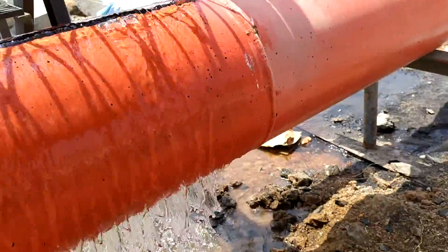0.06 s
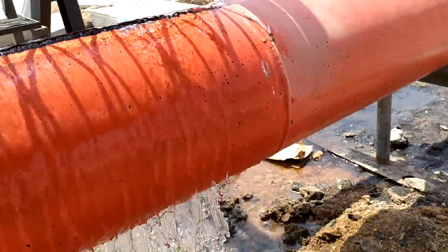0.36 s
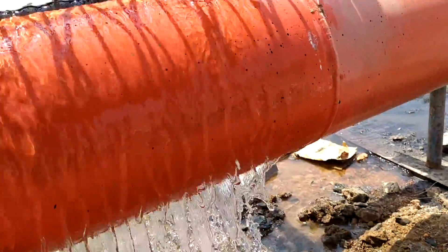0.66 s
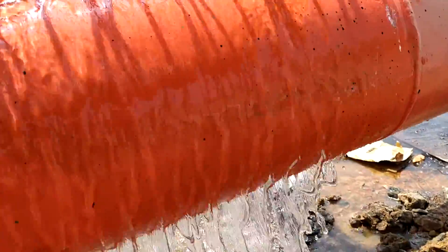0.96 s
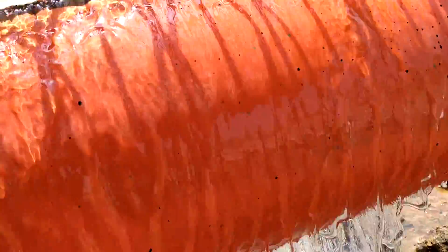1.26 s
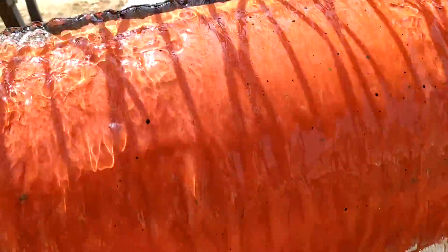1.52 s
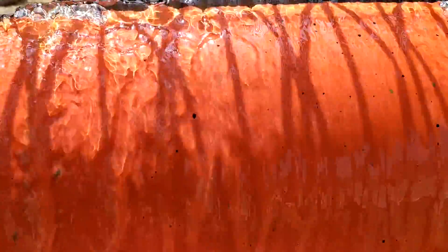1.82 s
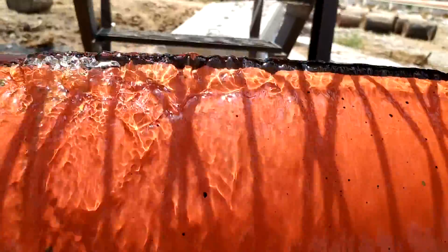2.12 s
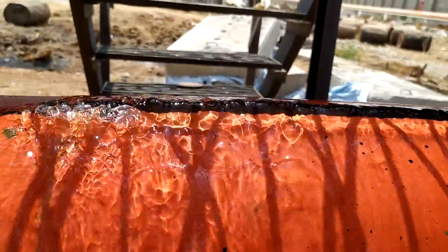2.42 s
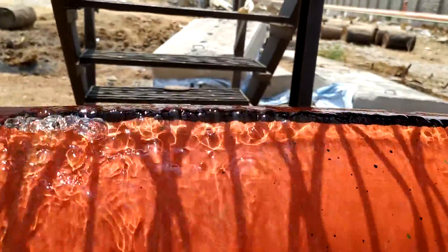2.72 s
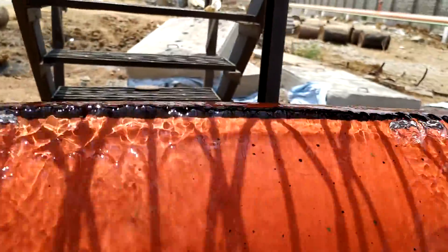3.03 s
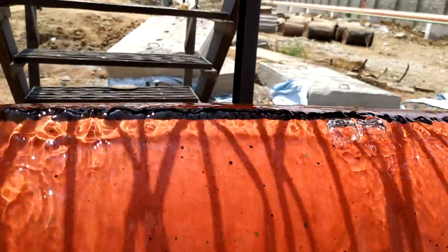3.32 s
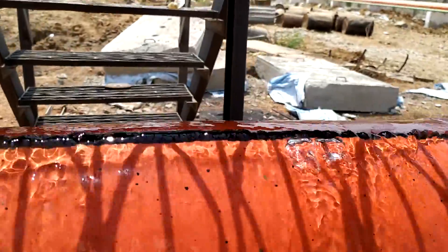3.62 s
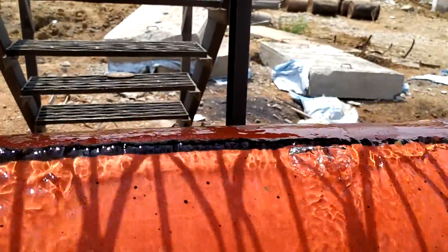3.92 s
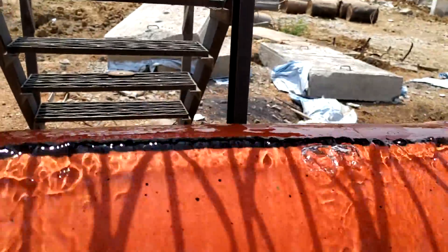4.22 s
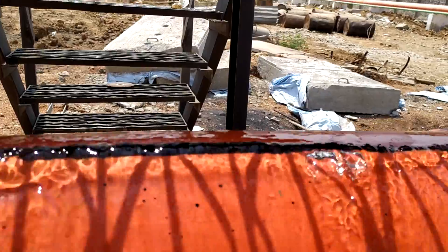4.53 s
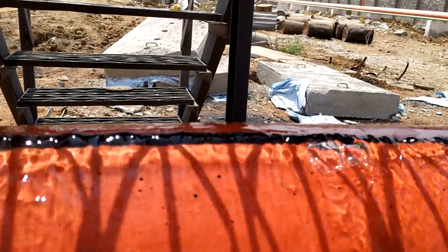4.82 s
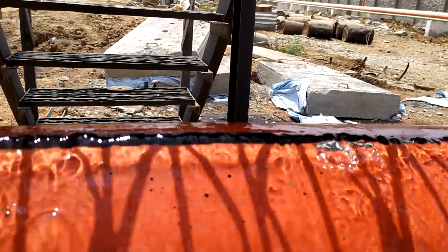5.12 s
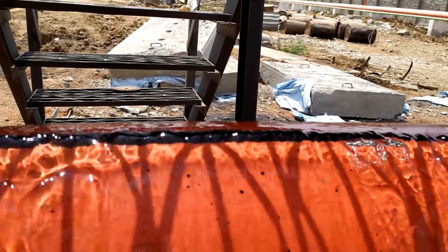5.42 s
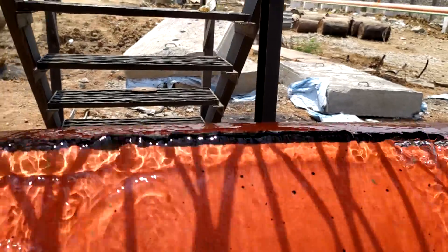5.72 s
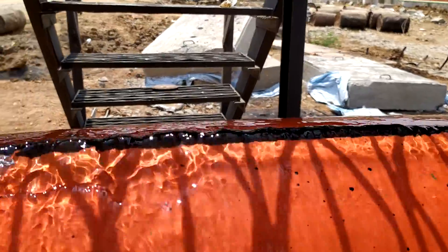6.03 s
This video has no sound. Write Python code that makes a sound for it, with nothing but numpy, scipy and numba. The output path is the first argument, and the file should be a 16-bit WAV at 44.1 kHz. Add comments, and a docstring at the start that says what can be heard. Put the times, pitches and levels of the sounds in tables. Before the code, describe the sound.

From the first moment, water gushes from a split in a big steel pipe and falls on wet ground outdoors, making a dense, bright, hissing splash with quick irregular surges. It lasts the whole six seconds. Beneath it, air churns in the split with a hollow gurgle and scattered short gulps. Close drops slap sharply on wet steel or plink, several times a second. Around 1 second, a puddle bubbles softly. Between about 0.5 and 2 seconds the microphone moves from beside the pipe up to the split, and the splash grows slightly louder, sitting a little to the left. The gurgling is fullest near 2 seconds. A distant diesel engine drones low and quiet throughout, working a touch harder around 2 seconds before easing. From about 5.5 seconds the water slackens very slightly but keeps running.

```python
"""A dense, surging splash is heard first: water wells from a split in a big steel pipe and falls on wet ground.
Each impact is a short damped tick and each trapped bubble a resonator; thousands of them add up to a hiss.
Air churns and gulps in the split, near drops slap and plink, and a diesel engine drones some way off.
A microphone with two ports rises from beside the pipe to the split, and the splash grows louder."""
import sys
import numpy as np
from scipy import signal
from scipy.fft import rfft, irfft
from scipy.io import wavfile
from scipy.ndimage import map_coordinates
from numba import njit

SR = 44100
rng = np.random.default_rng(int(sys.argv[2]) if len(sys.argv) > 2 else 0)


def master_out(mix):
    """Clip the mix to full scale and print it as 16-bit PCM to the path in sys.argv[1]."""
    frames = np.transpose(np.atleast_2d(mix))
    ceiling = np.clip(frames, -1, 1)
    pcm = np.round(ceiling * 32767).astype(np.int16)
    wavfile.write(sys.argv[1], SR, pcm)


N = 267246
TIME = np.arange(N) / SR

# engine harmonics: multiple of the cycle rate, rms level/dB, gain at full effort/dB, pipe shielding/(dB/s)
ENGINE_HARMONICS = [(3, -59.5, 0, -.15), (4, -50.9, 1, -1.3), (5, -50.3, 0, -.15), (7, -57, 5.5, -1),
                    (8, -64, 9, -.3), (10, -69, 4, 0), (12, -72, 4, 0), (14, -71, 3, 0)]
# spectrum of the engine rumble: f/Hz, relative level/dB
RUMBLE_SPECTRUM = [(12, -45), (29, -22), (45, -6), (62, 0), (85, -2), (125, -8.5), (200, -12), (320, -19),
                   (700, -35)]
# modes of the air space behind the split: f/Hz, width/Hz, gain/dB
CAVITY_MODES = [(521, 79, 3), (895, 132, 3.5), (1377, 190, -2.5)]
# air pockets leaving the split: t/s, level/dB, starting f/Hz, ring time/s, fractional rise in pitch
AIR_GULPS = [(.096, -29.5, 484, 0.092, 0), (.331, -28, 565, 0.089, 0), (.486, -31, 477, .08, 0.17),
             (0.913, -28.5, 480, 0.074, 0.075), (1.004, -28.5, 502, .14, 0.14),
             (1.009, -31, 259, 0.054, 1.3), (1.049, -31.5, 444, 0.17, .1), (1.347, -29.5, 468, 0.065, 0),
             (1.816, -30, 462, 0.063, 0.59), (1.995, -30, 406, 0.12, 0.46),
             (2.122, -27.5, 166, 0.037, 0.83), (2.63, -34.5, 297, 0.13, 1.4), (2.657, -33, 448, 0.091, 0.2),
             (2.691, -26, 385, 0.037, 0.69), (2.798, -37, 285, 0.088, 0.26), (2.896, -26, 507, 0.029, 0.05),
             (3.152, -25.5, 474, 0.034, 0.16), (3.608, -26.5, 433, .045, 0.91),
             (3.739, -31, 345, 0.036, 0.73), (3.74, -32, 540, 0.056, 0.36), (4.211, -28, 500, 0.065, 0.13),
             (4.263, -29.5, 91, 0.13, 0.052), (4.532, -28, 474, 0.077, 0.054),
             (4.808, -34, 442, 0.16, 0.24)]
# near drops striking wet steel: t/s, level/dB, f/Hz
DROP_SLAPS = [(.6314, -14.5, 5050), (1.0678, -12.5, 4050), (1.1777, -18, 2700), (1.2918, -13, 4830),
              (1.3969, -15, 3680), (1.509, -16, 4340), (1.672, -12.5, 8360), (1.8324, -12.5, 4100),
              (1.9328, -12, 5170), (1.9806, -16, 8150), (2.2964, -11.5, 6340), (2.5993, -14, 7500),
              (2.6294, -11, 5400), (2.7657, -16, 5940), (2.8422, -15.5, 5700), (3.1552, -13, 5400),
              (3.227, -17, 6450), (3.303, -14, 6150), (3.315, -16, 6100), (3.515, -14, 6800),
              (3.549, -13, 5400), (3.843, -11, 5900), (3.9946, -11, 5600), (4.0447, -12.5, 6250),
              (4.3717, -22, 6800), (4.4428, -13.5, 2600), (4.541, -13, 7460), (4.728, -13, 3800),
              (4.898, -12, 5460), (5.046, -17, 6400), (5.4944, -19, 6150), (5.7918, -12, 5600),
              (5.9354, -13, 3500), (5.9627, -20, 6430)]
# near drops trapping a bubble: t/s, level/dB, f/Hz, ring time/s
DROP_PLINKS = [(0.0747, -31, 1140, 0.038), (.397, -18, 2530, 0.028), (.815, -22.5, 900, 0.032),
               (.889, -21, 860, 0.018), (.923, -23, 2820, 0.028), (1.024, -18, 2400, 0.016),
               (1.396, -22, 3650, .03), (1.412, -28, 917, 0.059), (1.519, -20, 3100, .02),
               (1.59, -23, 830, .025), (1.631, -26, 2570, .03), (2.765, -18.5, 1260, 0.02),
               (3.123, -23, 1370, 0.024), (3.63, -25, 874, 0.053), (4.317, -24, 1220, 0.022),
               (4.643, -22, 1470, .02), (4.858, -27, 887, 0.066), (5.041, -20, 1950, 0.029),
               (5.05, -23, 1320, 0.058), (5.324, -23.5, 780, 0.029)]
# balance of the near drops, which land mostly on the left: f/Hz, left minus right level/dB
DROP_BALANCE = [(1200, 1), (2600, 10), (5000, -4), (12000, 19)]
# spectrum of the splash: f/Hz, relative level/dB
SPLASH_SPECTRUM = [(150, -18.5), (340, -26), (500, -16), (690, -15.5), (930, -10.5), (1100, -10),
                   (1380, -6), (1580, -11.5), (2150, -2), (2900, -0.43), (3800, -2.5), (5300, -0.94),
                   (8300, 0.7), (10000, -3), (11800, -6.5), (15800, -8.5)]
# added colour of the splash beside the pipe: f/Hz, gain/dB
BESIDE_PIPE = [(280, 3.5), (430, 10), (750, 0), (1080, 0), (1350, -4.8), (2000, 0), (2600, 0.5), (3300, -1),
               (4500, 2.5), (7000, -2.5), (9500, 0)]
# the pipe wall reflects the hiss to the left: f/Hz, left minus right level/dB
WALL_BALANCE = [(500, -2.5), (1550, -3.5), (1900, 0.5), (3300, 1), (4300, 3.5), (5300, 7), (7000, 4.5),
                (8300, 0.5), (13000, 0)]
# brief swells and dips in the splash at set times: t/s, change in level/dB
SPLASH_SURGES = [(.235, 2.3), (.335, 0.5), (1.03, 1), (1.074, 3.2), (1.393, 2), (1.513, 1.5), (1.635, 1),
                 (1.672, 0.5), (1.724, 1.5), (1.932, -2.5), (1.988, 1), (2.139, 1), (2.294, 2),
                 (2.601, -1.5), (2.768, 0.5), (3.021, 0.5), (3.156, 2), (3.226, 1.3), (3.505, 2),
                 (3.551, 1), (3.841, 0), (3.991, 0), (4.206, 1.8), (4.319, 2.2), (4.54, 2), (4.894, 1.8),
                 (5.197, 1), (5.936, 1.5)]

SIDES = np.array([[.5], [-.5]])  # shares of a left minus right difference


def undb(db):
    """Amplitude ratio of a level in decibels."""
    return 10 ** (np.asarray(db) / 20)


def level(x, db):
    """Scale to an rms level."""
    return x * undb(db) / np.sqrt(np.mean(x ** 2))


def colour(x, points, share=1):
    """Linear filtering by a curve of (f/Hz, gain/dB), or by a share of it."""
    hz, db = np.transpose(points)
    bins = np.maximum(np.fft.rfftfreq(N, 1 / SR), 1)
    return irfft(rfft(x) * undb(share * np.interp(np.log(bins), np.log(hz), db)), N)


def resonate(x, modes):
    """Modal superposition: parallel resonances with steep skirts."""
    bins = np.maximum(np.fft.rfftfreq(N, 1 / SR), 1)
    response = sum(undb(db) / (1 + .5j * hz / width * (bins / hz - hz / bins)) ** 2
                   for hz, width, db in modes)
    return irfft(rfft(x) * response, N)


def wander(per_s):
    """Smooth random fluctuation of unit rms, with `per_s` new values a second."""
    values = rng.standard_normal(N // 100)
    return level(map_coordinates(values, [TIME * per_s], order=3, mode="mirror"), 0)


def swell(at_s, width_s):
    """Gaussian envelope of unit height."""
    return np.exp(-.5 * np.minimum(((TIME - at_s) / width_s) ** 2, 100))


def pulse(at_s, attack_s, release_s):
    """Gaussian envelope with unequal flanks."""
    return swell(at_s, np.where(TIME < at_s, attack_s, release_s))


@njit
def ring(start, hz, t60, size, lag, rise, onset_cycles):
    """Damped oscillators gliding up in pitch; each reaches the left port `lag` s after the right."""
    out = np.zeros((2, N))
    for k in range(len(start)):
        count = int(t60[k] * SR * .8) + 2
        pole = (2j * np.pi * hz[k] - np.log(1000) / t60[k]) / SR
        glide = np.exp(2j * np.pi * hz[k] * rise[k] / SR / count)
        build = 1 - np.exp(-hz[k] / SR / max(onset_cycles, 1e-6))
        for port in range(2):
            arrival = (start[k] + (.5 - port) * lag[k]) * SR
            first = int(np.ceil(arrival))
            phasor = size[k] * np.exp(pole * (first - arrival))
            step, gain = np.exp(pole), 0.
            for i in range(max(first, 0), min(first + count, N)):
                gain += (1 - gain) * build
                out[port, i] += gain * phasor.imag
                phasor *= step
                step *= glide
    return out


def cloud(count, band_hz, cycles, scatter_db, rise, lag_ms, spread_ms):
    """Incoherent sum, at unit rms, of random damped tones that each ring for about `cycles` periods."""
    when, pitch, direction, sign = rng.random((count, 4)).T
    length, strength = rng.standard_normal((count, 2)).T
    low_hz, high_hz = band_hz
    hz = low_hz + (high_hz - low_hz) * pitch
    t60 = cycles * np.exp(.5 * length) / hz
    # dividing by the root of the ring time keeps the spectrum even
    size = np.sign(sign - .5) * undb(scatter_db * np.minimum(strength, 2)) / np.sqrt(t60)
    lag = (lag_ms + spread_ms * (2 * direction - 1)) / 1000
    return level(ring(when * N / SR, hz, t60, size, lag, np.full(count, float(rise)), 0.), 0)


def ebb_db(from_s=5.45, db_per_s=-1):
    """Exponential decay of the water sound as the flow slackens near the end."""
    return db_per_s * np.maximum(TIME - from_s, 0)


def engine(rest_hz=12.73, effort_hz=.14):
    """Periodic forcing: a far diesel's uneven cylinders give harmonics of its cycle rate over a rumble."""
    effort = swell(at_s=2.2, width_s=1.15)  # it works a little harder once, then eases off
    cycle_hz = (rest_hz + effort_hz * effort) * (1 + .002 * wander(4))
    turns = np.cumsum(cycle_hz) / SR
    tones = 0
    for order, db, effort_db, shield_db_per_s in ENGINE_HARMONICS:
        rms = undb(db + effort_db * effort + shield_db_per_s * TIME + wander(5.07))
        tones = tones + np.sqrt(2) * rms * np.sin(2 * np.pi * (order * turns + rng.random()))
    middle, side = colour(rng.standard_normal((2, N)), RUMBLE_SPECTRUM)
    return tones + level(middle, db=-53.8) + level(side, db=-58.8) * np.array([[1], [-1]])


def puddle():
    """Bubble resonance: water drives air into the puddle, heard as the microphone passes over it."""
    bubbles = cloud(1400, band_hz=(566, 1230), cycles=50, scatter_db=1.5,
                    rise=.15, lag_ms=.046, spread_ms=.2)
    bubbles = colour(bubbles, [(250, -22), (550, 4), (1200, 0), (2500, -14)])
    return bubbles * undb(-46) * swell(at_s=1.1, width_s=.38)


def gurgle(pitch_wander=.05):
    """Cavity resonance: churning bubbles ring the air behind the split; rocking water bends the pitch."""
    churn = cloud(5000, band_hz=(390, 1670), cycles=7.3, scatter_db=5,
                  rise=.17, lag_ms=.11, spread_ms=.079)
    passing_outflow = swell(at_s=1.8, width_s=.66)
    churn_db = -42.5 + 2.1 * passing_outflow + 2 * wander(28) + ebb_db()
    cavity = resonate(churn, CAVITY_MODES)
    warped_time = np.cumsum(1 + pitch_wander * wander(9))
    rocking = np.array([map_coordinates(port, [warped_time], mode="mirror") for port in cavity])
    return level(rocking, 0) * undb(churn_db)


def gulps():
    """Volume pulsation: large air pockets ring low as they leave the split, most rising as they surface."""
    start, db, hz, t60, rise = np.transpose(AIR_GULPS).copy()
    return ring(start, hz, t60, undb(db), np.zeros(len(start)), rise, onset_cycles=.48)


def near_drops(slap_t60_s=.007, spray_db=-13.5, pitch_rise=.08):
    """Impact excitation: drops slap the steel with a puff of spray, or trap a bubble that plinks."""
    start, db, hz = np.transpose(DROP_SLAPS).copy()
    t60 = np.full_like(start, slap_t60_s)
    lag, rise = np.zeros_like(start), np.full_like(start, pitch_rise)
    slaps = ring(start, hz, t60, undb(db), lag, rise, onset_cycles=.7)
    puffs = sum(undb(slap_db + spray_db) * pulse(at, attack_s=.0005, release_s=.0025)
                for at, slap_db, _ in DROP_SLAPS)
    spray = puffs * cloud(30000, band_hz=(2500, 10000), cycles=4, scatter_db=2,
                          rise=0, lag_ms=0, spread_ms=.1)
    start, db, hz, t60 = np.transpose(DROP_PLINKS).copy()
    lag, rise = np.zeros_like(start), np.full_like(start, pitch_rise)
    plinks = ring(start, hz, t60, undb(db), lag, rise, onset_cycles=.48)
    return colour(slaps + spray + plinks, DROP_BALANCE, SIDES)


def surging(slugs_per_s=12, surge_db=2.01, looseness=.45):
    """Amplitude modulation in dB: slugs of water land at a loose rhythm, amid set swells and dips."""
    landings = np.cumsum(np.exp(looseness * rng.standard_normal(100))) / slugs_per_s
    random_surges = [(at, surge_db) for at in landings[landings < TIME[-1]]]
    return sum(db * pulse(at, attack_s=.0069, release_s=.012) for at, db in random_surges + SPLASH_SURGES)


def splash(approach_s=(.4, 2.07), near_gain_db=2):
    """Incoherent addition: the ticks, fizz, bubbles and pings of falling water merge into a hiss."""
    ticks = cloud(95000, band_hz=(122, 18100), cycles=3.9, scatter_db=1.5,
                  rise=0, lag_ms=.094, spread_ms=.356)
    fizz = cloud(30000, band_hz=(518.3, 11080), cycles=68, scatter_db=2.5,
                 rise=.18, lag_ms=.076, spread_ms=.397)
    bubbles = cloud(1800, band_hz=(1700, 6500), cycles=130, scatter_db=4,
                    rise=.04, lag_ms=.06, spread_ms=.25)
    pings = cloud(260, band_hz=(2000, 3200), cycles=55, scatter_db=2.5,
                  rise=.08, lag_ms=.03, spread_ms=.06)
    near = np.interp(TIME, approach_s, (0, 1))  # microphone: 0 beside the pipe, 1 at the split
    fine = level(ticks + undb(-4) * fizz, 0)
    coarse = undb(-16 + 4 * near) * bubbles + undb(-21) * near * pings
    water = colour(fine + coarse, SPLASH_SPECTRUM)
    water = near * water + (1 - near) * colour(water, BESIDE_PIPE)
    unrest_db = .3 * wander(24)
    water = level(water, -26) * undb(near_gain_db * near + surging() + unrest_db + ebb_db())
    leftward_db = 1 + near
    return colour(water, WALL_BALANCE, SIDES) * undb(SIDES * leftward_db)


def scene():
    """Superposition in open air: water in front, the engine behind."""
    return splash() + gurgle() + puddle() + gulps() + near_drops() + engine()


def record(dry, low_hz=30, top_hz=15900):
    """Band limiting: the deepest bass falls away, and the microphone cuts the top steeply."""
    thinned = signal.sosfilt(signal.butter(4, low_hz, "high", fs=SR, output="sos"), dry)
    return signal.sosfilt(signal.ellip(12, .1, 90, top_hz, fs=SR, output="sos"), thinned)


dry = scene()
out = record(dry)
master_out(out)
```